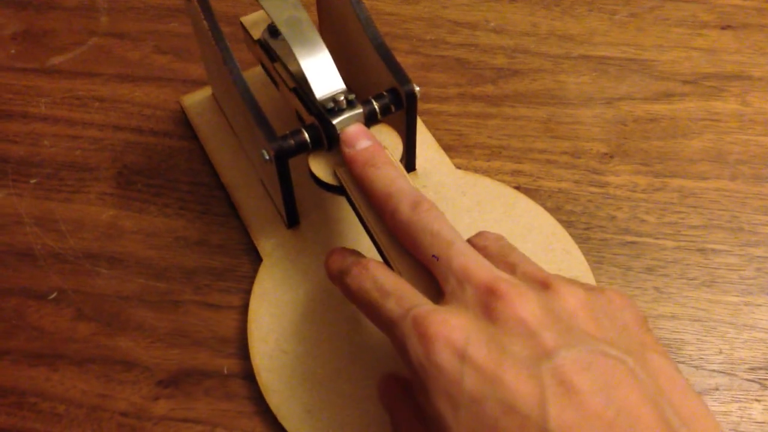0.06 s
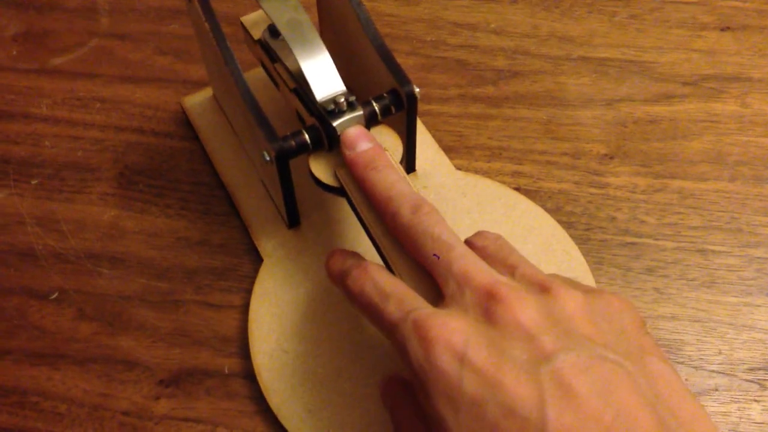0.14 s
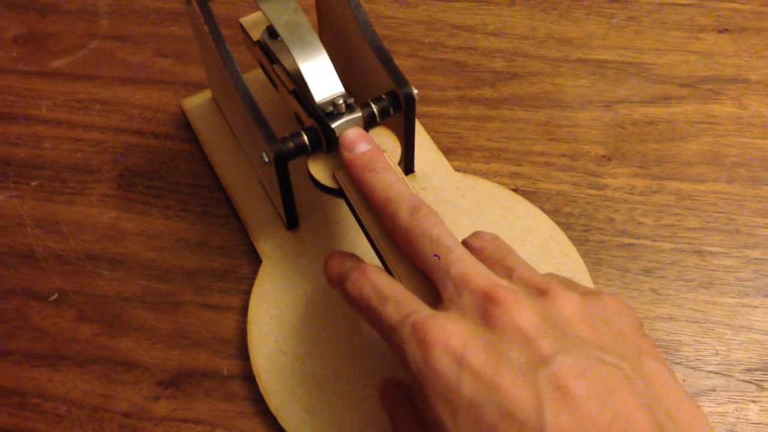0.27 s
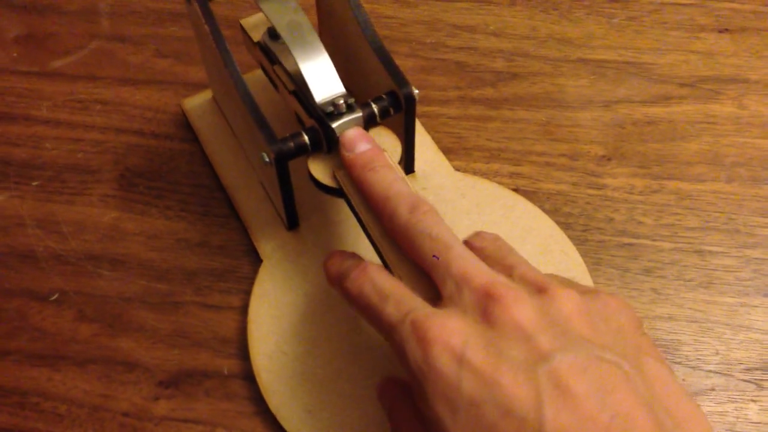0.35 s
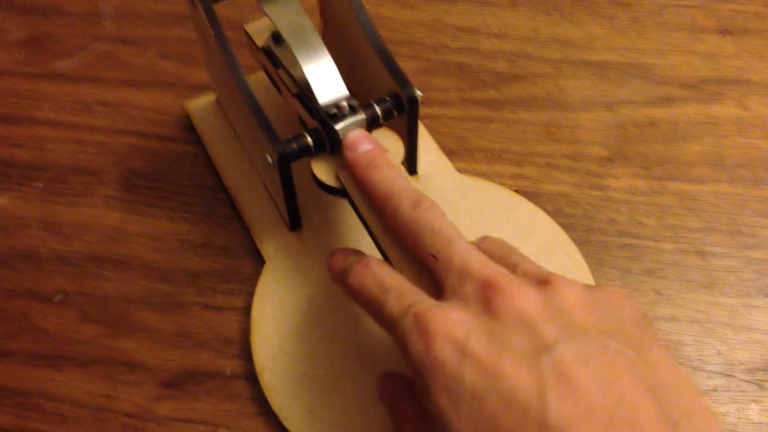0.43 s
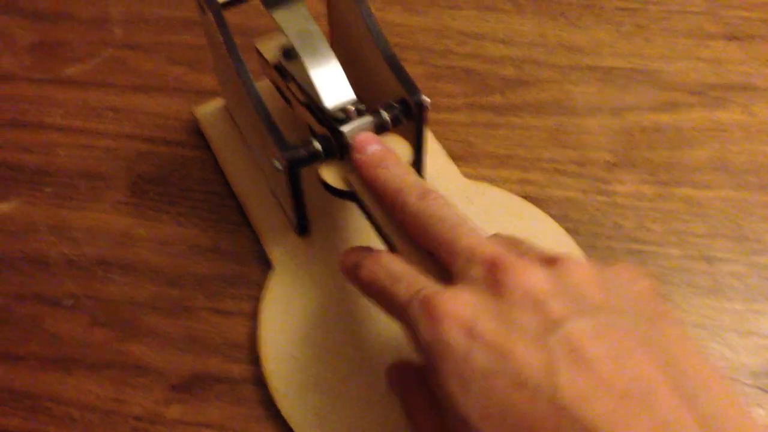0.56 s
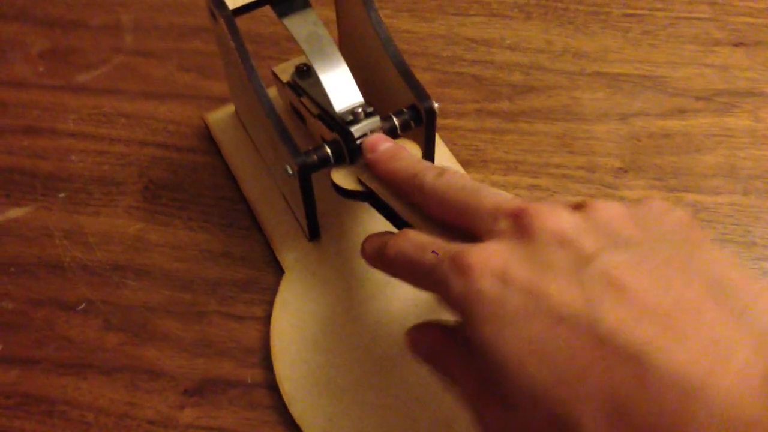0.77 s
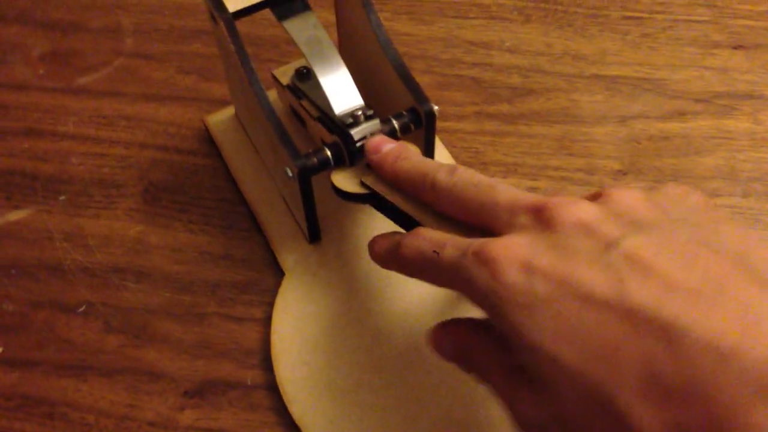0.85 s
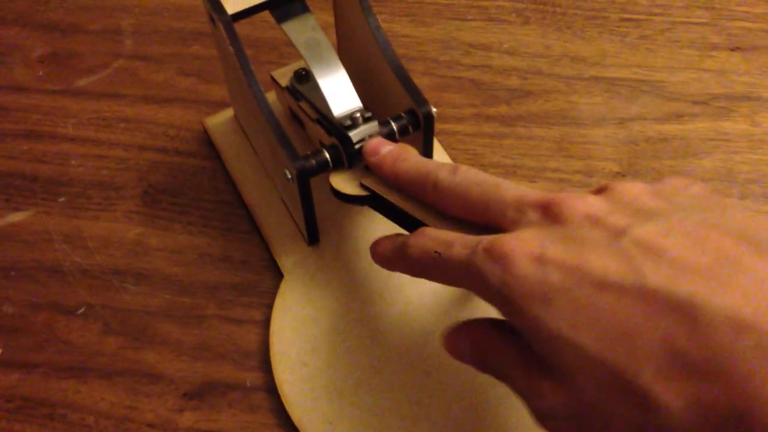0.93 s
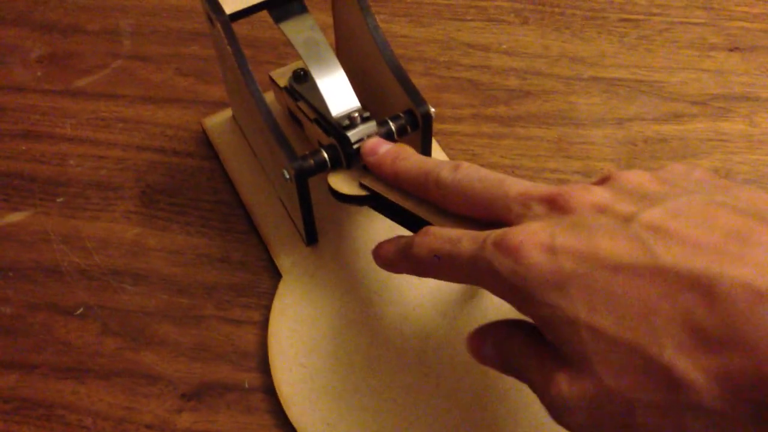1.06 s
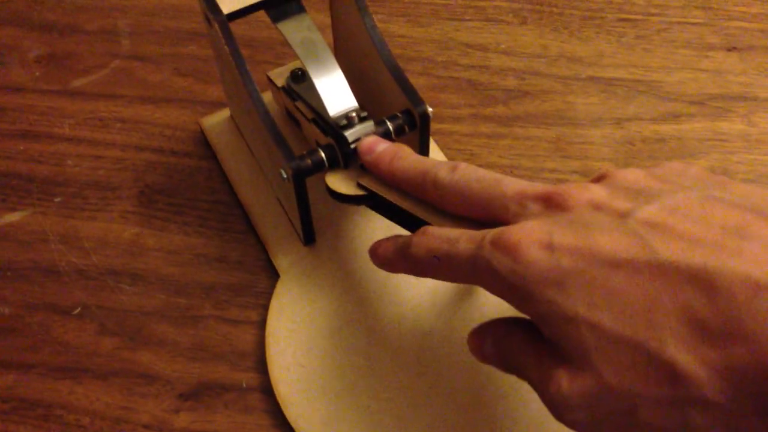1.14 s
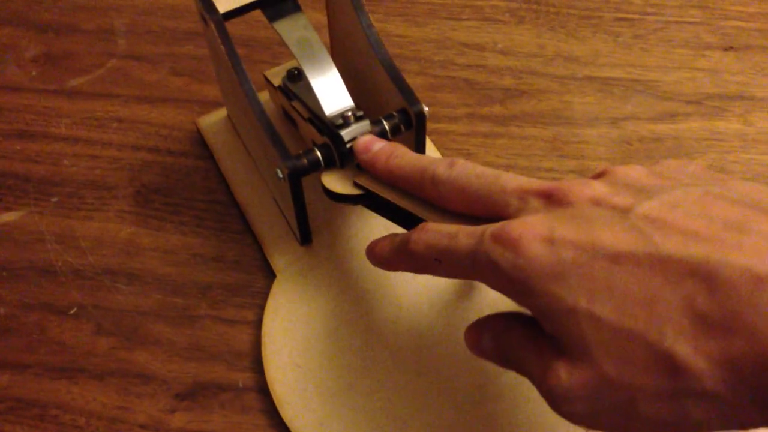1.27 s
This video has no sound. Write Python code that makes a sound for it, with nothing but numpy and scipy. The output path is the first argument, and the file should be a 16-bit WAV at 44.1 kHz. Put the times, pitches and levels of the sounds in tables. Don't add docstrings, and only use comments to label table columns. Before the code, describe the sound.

One crisp nail clipper snip with a short room tail over very faint hum and hiss

```python
import sys
import numpy as np
from scipy import signal
from scipy.io import wavfile

SR = 44100
rng = np.random.default_rng(int(sys.argv[2]) if len(sys.argv) > 2 else 0)


def ratio(d):
    e = np.asarray(d, float) / 20
    return 10 ** e


def unload_wav(signal):
    wavfile.write(
        sys.argv[1],
        SR,
        np.round(np.clip(np.atleast_2d(signal).T, -1, 1) * 32767).astype(np.int16),
    )


N = 57330
SNAP_S = .228


def rms_one(x):
    return x / np.sqrt(np.mean(x ** 2) + 1e-20)


def at_hz(points, hz):
    table_hz, value = np.transpose(points)
    return np.interp(np.log(hz), np.log(table_hz), value)


def highpass(x, order, hz):
    return signal.sosfilt(signal.butter(order, hz, "high", fs=SR, output="sos"), x)


def drift(rate_hz):
    r = np.exp(-2 * np.pi * rate_hz * 40 / SR)
    noise = rng.standard_normal(N // 40 + 2002)
    slow = signal.lfilter([1], [1, -2 * r, r * r], noise)[2000:]
    return np.interp(np.arange(N) / 40, np.arange(len(slow)), rms_one(slow - slow.mean()))


def ring(x, hz, t60):
    r = ratio(-60 / (t60 * SR))
    w = 2 * np.pi * hz / SR
    return signal.lfilter([0, np.sin(w)], [1, -2 * r * np.cos(w), r * r], x + 1e-18)


def narrow_noise(hz, width_hz):
    noise = rng.standard_normal(N + SR // 4)
    return rms_one(ring(noise, hz, 2.2 / width_hz)[-N:])


def bands():
    edges = 35 * 2 ** np.arange(0, 9.1, 1 / 3)
    white = rng.standard_normal((2, N + SR // 4))
    for k, (low, high) in enumerate(zip(edges, edges[1:])):
        band = signal.butter(2, [low, high], "band", fs=SR, output="sos")
        yield np.sqrt(low * high), signal.sosfilt(band, white[k % 2])[-N:]


def struck(events, modes, scatter_db, flip=1):
    s, db = np.transpose(events)
    at = np.round(s * SR).astype(int)
    chance = rng.standard_normal((len(s), len(modes), 2))
    push_or_pull = np.sign(chance[:, 0, 1])
    out = np.zeros(N)
    for k, (hz, level_db, t60) in enumerate(modes):
        strength = ratio(db + level_db + scatter_db * chance[:, k, 0])
        clicks = np.zeros(N)
        np.add.at(clicks, at, strength * push_or_pull * flip ** k)
        out += ring(clicks, hz, t60)
    return out


# pitch in Hz, level in dB.
HISS_COLOUR = [(40, -34), (130, -19), (209, -6), (320, -15), (450, -15.5), (1370, -25), (13000, -27),
               (16500, -27)]
# pitch in Hz, width in Hz, level in dB.
FAR_HUM = [(150, 12, -84), (208, 15, -68), (434, 42, -78)]


def background():
    hiss_db, patchy_db, swell_db = -65, 0.5, 3.5
    hiss = sum(band * ratio(at_hz(HISS_COLOUR, hz) + patchy_db * drift(8)) for hz, band in bands())
    hum = sum(ratio(db + swell_db * drift(5)) * narrow_noise(hz, width) for hz, width, db in FAR_HUM)
    return ratio(hiss_db) * rms_one(hiss) + hum


# pitch in Hz, level in dB.
ROOM_COLOUR = [(400, -10.5), (1000, -4), (2000, 0), (3050, 3.5), (4500, -3), (5900, 1.5), (10000, 2),
               (15000, -2)]
# pitch in Hz, time to fall by 60 dB in seconds.
ROOM_FADE = [(300, 0.26), (1000, 0.21), (3000, 0.26), (6000, .29), (14000, .25)]
# pitch in Hz, width in Hz, level in dB, time to fall by 60 dB in seconds.
TAIL_SHIMMER = [(1450, 100, -55, .25), (2030, 120, -50, .32), (2720, 150, -48, .36), (3050, 200, -44, .36),
                (3280, 150, -48, .34), (5780, 250, -46, .33)]


def room():
    room_db, build_s = -30.5, 0.009
    t = np.maximum(np.arange(N) / SR - SNAP_S, 0)
    answer = sum(band * ratio(at_hz(ROOM_COLOUR, hz) - 60 * t / at_hz(ROOM_FADE, hz))
                 for hz, band in bands())
    shimmer = sum(narrow_noise(hz, width) * ratio(db - 60 * t / t60)
                  for hz, width, db, t60 in TAIL_SHIMMER)
    return (ratio(room_db) * answer + shimmer) * (1 - np.exp(-t / build_s))


# pitch in Hz, level in dB, time to fall by 60 dB in seconds.
STAND = [(203.3, -40.5, .1), (213.4, -36.5, .11), (253, -38.5, .11), (279.4, -42, .07), (722, -34.5, 0.11),
         (760, -36.5, .05), (1413, -32, 0.12)]


def board():
    lag_s, soft_hz = 0.0018, 600.5
    jolt = struck([(SNAP_S + lag_s, 6)], STAND, scatter_db=0, flip=-1)
    dull = np.exp(-2 * np.pi * soft_hz / SR)
    return signal.lfilter([(1 - dull) ** 2], [1, -2 * dull, dull ** 2], jolt)


# time in seconds, level in dB.
SQUEAK_SWELL = [
    (.209, -69.5),
    (.214, -55),
    (.2185, -60),
    (.222, -41.5),
    (.2250, -34),
    (.2266, -30.5),
    (.2272, -67.5),
]


def squeak():
    hz, rough, width_hz = 2480, 0.27, 830
    t = np.arange(N) / SR
    pure = np.sqrt(2) * np.sin(2 * np.pi * hz * t)
    tone = pure + rough * narrow_noise(hz, width_hz)
    s, db = np.transpose(SQUEAK_SWELL)
    return tone * ratio(np.interp(t, s, db, left=-140, right=-140))


# start in seconds, level in dB.
NAIL_TICKS = [
    (0.2045, -45.5),
    (.2160, -45),
]
# start in seconds, level in dB.
NAIL_FRACTURES = [
    (.2271, -22),
    (.22733, -6.5),
    (.22790, -8.5),
    (.2282, -15.5),
    (.2289, -23),
    (.2300, -26),
]
# pitch in Hz, level in dB, time to fall by 60 dB in seconds.
JAW_TONES = [(5200, -10, .005), (6394, -5, 0.0065), (7900, -8.5, .006), (8950, -11.5, 0.0034),
             (10430, 0, 0.0044), (12100, -0.5, .005), (14200, -3, 0.0046)]
# start in seconds, level in dB.
JAW_SLAM = [
    (.22755, -8),
    (.2289, -17),
    (.2302, -20),
]
# pitch in Hz, level in dB, time to fall by 60 dB in seconds.
LEVER_TONES = [(1190, -15, .02), (1610, -22, .015), (2019, -16, .015), (2380, -12.5, .015),
               (2707, -10.5, .025), (3161, -1.5, .018), (4240, -3, .008)]


def snap():
    jaws = highpass(struck(NAIL_FRACTURES + NAIL_TICKS, JAW_TONES, scatter_db=2.5), 2, 4600)
    lever = struck(JAW_SLAM, LEVER_TONES, scatter_db=1.0)
    return highpass(jaws + lever, 2, 1200) * ratio(-5)


def scene():
    return (snap() + squeak() + board() + room() + background())[None]


def roll_off(x):
    return signal.sosfilt(signal.butter(12, 17080, fs=SR, output="sos"), x)


def record(dry):
    duck_db, attack_s, recover_s = 8.5, 0.077, 1.3
    top_from_hz, top_open_s, top_db = 15550, .003, -17.5
    t = np.arange(N) / SR - SNAP_S
    since = np.maximum(t, 0)
    gain = ratio(-duck_db * (1 - np.exp(-since / attack_s)) * np.exp(-since / recover_s))
    mic = gain * highpass(dry, 3, 106)
    below_top = signal.sosfiltfilt(signal.cheby2(20, 40, top_from_hz, fs=SR, output="sos"), mic)
    top = ratio(top_db) * (mic - below_top) * np.exp(-(t / top_open_s) ** 2)
    return roll_off(below_top + top)


dry = scene()
out = record(dry)
unload_wav(out)
```